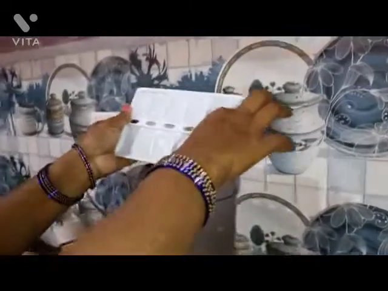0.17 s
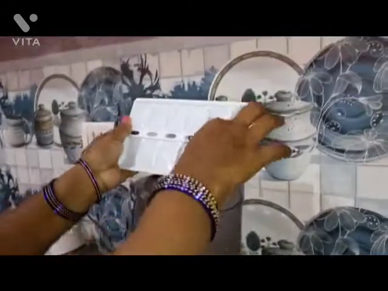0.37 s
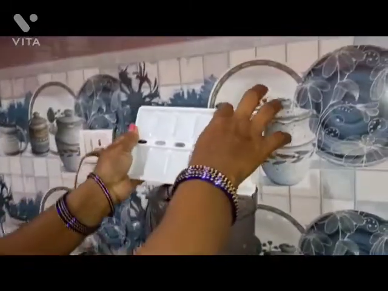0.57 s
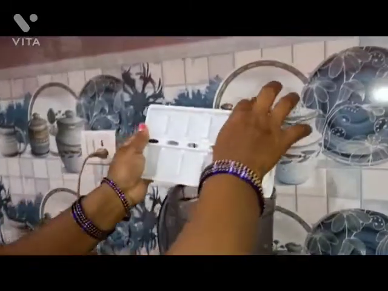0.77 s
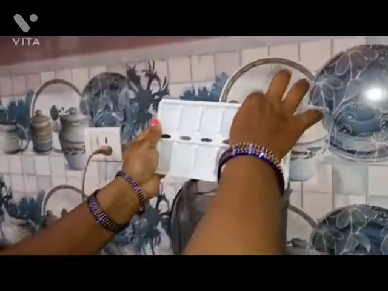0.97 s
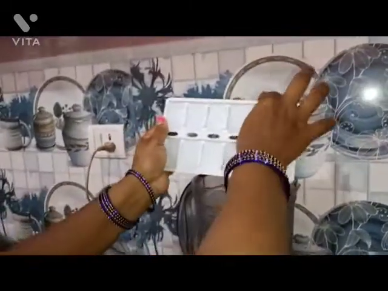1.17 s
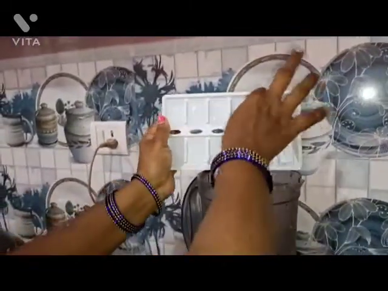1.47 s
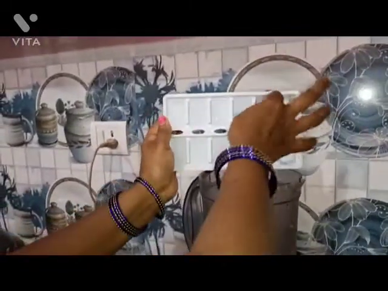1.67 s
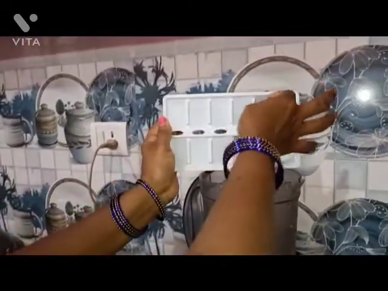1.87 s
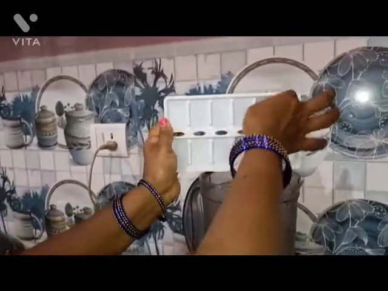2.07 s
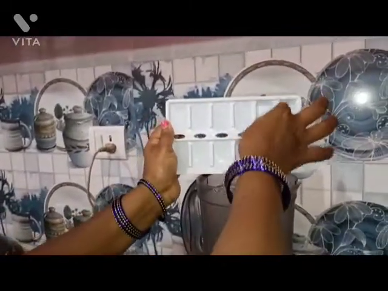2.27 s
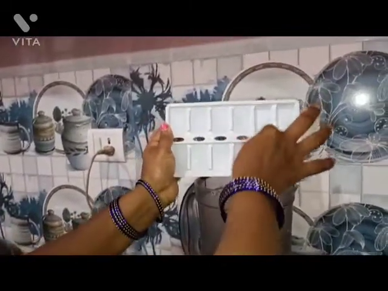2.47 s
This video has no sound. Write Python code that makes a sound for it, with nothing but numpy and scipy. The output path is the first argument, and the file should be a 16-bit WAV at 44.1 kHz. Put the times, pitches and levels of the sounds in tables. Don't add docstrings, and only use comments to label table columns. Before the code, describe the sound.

Ice cubes crack from a twisted plastic tray and clatter into a plastic jar in two bursts

```python
import sys
import numpy as np
from scipy import signal
from scipy.fft import rfft, irfft
from scipy.io import wavfile
from scipy.ndimage import uniform_filter1d

SR = 44100
rng = np.random.default_rng(int(sys.argv[2]) if len(sys.argv) > 2 else 0)


def magnitude_from_level(level_db):
    exponent = np.asarray(level_db, float) / 20
    return 10 ** exponent


def master_out(mix):
    frames = np.transpose(np.atleast_2d(mix))
    ceiling = np.clip(frames, -1, 1)
    pcm = np.round(ceiling * 32767).astype(np.int16)
    wavfile.write(sys.argv[1], SR, pcm)


N = 114660

# (frequency [Hz], density [dB per Hz])
HUM_SPECTRUM = [(12, -64), (20, -0.5), (123, -14.5), (154, -12.5), (252, -7.5), (1000, -14), (3970, -20.5),
                (4820, -30), (14500, -44.5)]
# (frequency [Hz], width [Hz], level [dB])
DRONES = [(81.8, 4, -67), (121.3, 22, -69), (251.8, 15, -63), (471, 81, -67)]
# (frequency [Hz], left-right likeness [0-1])
HUM_COHERENCE = [(60, 0.93), (240, 1), (950, 0.22), (3770, 0.023), (15000, 1)]
# (frequency [Hz], left minus right [dB])
HUM_BALANCE = [(60, 1), (950, -2), (15000, 18.5)]
# (time [s], level [dB])
HISS_LEVEL = [(0, -61.5), (.18, -55.5), (.8, -66.5), (1.5, -71), (1.9, -73), (2.6, -88.5)]
# (time [s], level [dB])
GRIP_LEVEL = [(0, -64), (.2, -81), (2, -66), (2.15, -60), (2.4, -65), (2.6, -78)]
# (time [s], level [dB], frequency [Hz])
COUNTER_BUMP = (.35, -42, 55)
# (frequency [Hz], t60 [s])
KITCHEN_T60 = [(1000, 0.29), (2000, 0.67), (3500, 0.63), (6000, 0.6), (10000, 0.32), (15000, 0.23)]
# (frequency [Hz], width [Hz], gain [dB])
TILE_MODES = [(1950, 160, 5), (3134, 106, 3)]
# (frequency [Hz], left minus right [dB])
PORT_BALANCE = [(300, 5), (700, -7), (1400, -2), (3000, 12), (5500, 12.5), (8500, -6.5), (11000, -0.5),
                (14000, 10)]
# (time [s], level [dB], centre [Hz], t60 [s], spread [octaves])
CREAKS = [(0.173, -49, 4400, 0.099, 0.42), (.827, -32, 3650, 0.045, 0.11), (0.98, -44.5, 3900, 0.035, 0.65),
          (1.18, -60.5, 4060, 0.26, 0.64), (1.313, -49.5, 3500, 0.088, 0.33),
          (1.462, -51, 3860, 0.088, 0.6), (1.657, -45, 4980, 0.034, 0.51), (2.005, -53.5, 2720, .15, 0.44),
          (2.018, -40.5, 3620, 0.039, 0.48), (2.027, -42, 3640, 0.055, 0.65),
          (2.044, -48, 3700, 0.25, 0.62)]
# (time [s], peak [dB], ring [Hz], low body [dB], edge [dB])
SNAPS = [
    (0.827, -22, 3750, -38, -23.5),
    (2.066, -13, 3500, -8, -36),
    (2.0706, -8, 3500, -12.5, -33),
    (2.0801, -24, 3660, -26, -32),
    (2.0898, -22, 3500, -26, -23),
]
# (time [s], level [dB], t60 [s], rise [s], top frequency [Hz])
CRACKS = [
    (.2, -14, 0.09, 0.0028, 16000),
    (1.64, -49, 0.42, 0.0035, 8600),
    (2.074, -36.5, 0.17, 0.0063, 11800),
    (2.195, -47, .03, 0.00039, 16200),
    (2.301, -19, 0.012, 0.0016, 16000),
]
# (frequency [Hz], level [dB])
CRACK_SPECTRUM = [(180, -81), (300, 1.5), (856, -26), (1080, -8), (3950, -4), (4990, -6), (6520, -0.5),
                  (14700, -10.5), (16000, -36)]
# (time [s], level [dB])
RATTLE_LEVELS = [
    [(.3, -35), (.32, -21.5), (.39, -29.5), (.45, -34.5), (.6, -40), (.7, -49)],
    [(2.2, -42), (2.24, -33.5), (2.42, -63), (2.5, -80)],
]
# (frequency [Hz], level [dB], t60 [s])
ICE_MODES = [(2120, 5.5, 0.012), (2600, -32, 0.017), (3000, -4, 0.071), (3118, -2.5, 0.052),
             (3230, -1.5, 0.048), (3478, 1, 0.025), (3700, -1.5, 0.082), (3930, 1, 0.05), (4456, -6, 0.094),
             (5310, 1, 0.064), (5650, -5, 0.084), (6670, 3, 0.012)]
# (frequency [Hz], level [dB], t60 [s])
WALL_MODES = [(480, -12, .09), (1110, -1, .06), (1210, 0, .065), (1450, -7, .04), (1750, -8, .035)]
# (frequency [Hz], level [dB])
BODY_SPECTRUM = [(750, -45), (1100, -2.5), (2200, 1.5), (3200, -1.5), (4200, -11), (5600, -4), (7000, -3),
                 (9000, -4)]
# (frequency [Hz], level [dB])
EDGE_SPECTRUM = [(5000, -11), (7000, -7.5), (8300, -4), (10500, 6), (12500, -2.5), (15000, -13),
                 (16500, -29)]
# (time [s], peak [dB], body [dB], edge [dB], ring time scale)
LANDINGS = [
    (0.2933, -3, -14, -15, 0.78),
    (2.194, -7.5, -12.5, -10.5, 0.77),
    (2.2268, -4.5, -11.5, -21, 0.64),
    (2.3028, -5, -12, -19.5, 0.56),
]
# (frequency [Hz], level [dB], t60 [s])
LANDING_MODES = [
    [(483, -19, 0.071), (1076, -7.5, 0.03), (1720, -14.5, 0.04), (2930, -4, 0.032), (3350, -2, 0.053),
     (3850, -8.5, 0.046), (5060, -26, 0.022)],
    [(488, -17.5, 0.19), (1177, -3, 0.062), (1510, -18, .03), (2495, -1, 0.032), (2820, -5, 0.036),
     (3280, 0.5, .035), (3800, -3.5, 0.03), (4540, -14, 0.04)],
    [(1172, -5.5, 0.055), (2230, 0, 0.047), (2580, -16, .04), (3124, -1, 0.068), (3500, -10.5, 0.036),
     (3930, -7, 0.049), (4300, -11, 0.027), (5530, -8, 0.034)],
    [(1083, -15.5, 0.073), (1464, -6.5, 0.056), (2340, 2, 0.036), (2634, -9.5, 0.028), (3050, -1.5, 0.059),
     (3288, -4.5, .04), (3700, -8, 0.042), (4790, -8, .03)],
]
# (time [s], peak [dB], strongest ring [Hz], wall boom [dB], edge [dB])
CLACKS = [(0.308, -16, 3500, -47, -13), (0.3146, -5, 4010, -31.5, -15.5), (0.325, -23, 3800, -35, -30),
          (0.333, -5.5, 5700, -42, -32), (0.339, -11, 3920, -42, -16), (0.347, -12, 4200, -39, -25),
          (0.35, -7, 5800, -38, -14), (0.3615, -5.5, 3500, -24, -17.5), (0.368, -14, 3500, -35, -18),
          (0.378, -9.5, 3700, -30.5, -18), (0.3844, -5, 3820, -26.5, -21), (0.39, -14.5, 3550, -31, -23),
          (0.4, -19, 3700, -43, -30), (0.471, -11.5, 3050, -23.5, -23), (0.544, -20, 3000, -13, -20),
          (0.6154, -40, 3800, -38, -30)]
# (frequency [Hz], level [dB], t60 [s])
CUP_MODES = [(1420, -37, 0.39), (1940, -36, 0.43), (3070, -43, 0.59), (3100, -40, .4)]
# (time [s], level [dB])
CUP_HITS = [
    (2.192, -3),
    (2.227, -11),
    (2.305, -13),
]


def evened(x):
    return x / np.sqrt(np.mean(x ** 2) + 1e-20)


def read(points, hz):
    f, value = np.transpose(points)
    return np.interp(np.log(hz + 1), np.log(f + 1), value)


def add(mix, s, sound):
    part = mix[round(s * SR):][:len(sound)]
    part += sound[:len(part)]


def colour(x, points, share=1):
    gain = magnitude_from_level(share * read(points, np.fft.rfftfreq(x.shape[-1], 1 / SR)))
    return irfft(rfft(x) * gain, x.shape[-1])


def resonance(hz, centre, width):
    return 1 / (1 + (2 * (hz - centre) / width) ** 2)


def burst(points, t60, centre_hz=3200, spread=1.8):
    t, hz = np.arange(4096) / SR, np.fft.rfftfreq(4096, 1 / SR)
    octaves = np.log2((hz + 1) / centre_hz)
    lean = magnitude_from_level(read(points, hz) - 6.9 * (octaves / spread) ** 2)
    noise = evened(irfft(rfft(rng.standard_normal(4096)) * lean))
    return noise * magnitude_from_level(-60 * t / t60) * np.minimum(t / 0.00042, 1)


def edge(t60):
    return burst(EDGE_SPECTRUM, t60, 9300, 18.0)


def ring(modes, centre_hz, spread, scatter_db, t60_scale=1):
    t = np.arange(4096) / SR
    hz, db, t60 = np.transpose(modes)[:, :, None]
    u = rng.standard_normal((3, len(modes), 1))
    db = db + scatter_db * u[0] - 9 * (np.log2(hz / centre_hz) / spread) ** 2
    decay = magnitude_from_level(db - 60 * t / (t60 * t60_scale))
    x = (decay * np.sin(2 * np.pi * hz * (1 + 0.025 * u[1]) * t + 1.11 * u[2])).sum(0)
    return x * np.minimum(t / 0.00088, 1) / abs(x).max()


def hum():
    frames, hz = N // 256 + 5, np.fft.rfftfreq(1024, 1 / SR)
    a, b, c, d, patches = rng.standard_normal((frames, 513, 5)).T
    patches = evened(uniform_filter1d(uniform_filter1d(patches, 10, 0), 12, 1))
    same = np.clip(read(HUM_COHERENCE, hz), -1, 1)[:, None]
    left = a + 1j * b
    right = same * left + np.sqrt(1 - same ** 2) * (c + 1j * d)
    half_balance = np.array([[.5], [-.5]]) * read(HUM_BALANCE, hz)
    spectrum = magnitude_from_level(half_balance + read(HUM_SPECTRUM, hz))[:, :, None]
    z = np.array([left, right]) * spectrum * magnitude_from_level(0.6 * patches)
    out = magnitude_from_level(-55) * evened(signal.istft(z, nperseg=1024, noverlap=768)[1][:, :N])
    t, fine = np.arange(N) / SR, np.fft.rfftfreq(N, 1 / SR)
    for f, width, db in DRONES:
        noise = rng.standard_normal((3, N))
        shared = noise[0] + 0.42 * noise[1:]
        out += magnitude_from_level(db) * evened(irfft(rfft(shared) * resonance(fine, f, width), N))
    hiss_spectrum = [(1000, -17), (3500, -9), (7000, 2.0), (14000, -1), (15500, -15)]
    hiss = evened(colour(rng.standard_normal((2, N)), hiss_spectrum))
    return out + hiss * magnitude_from_level(np.interp(t, *np.transpose(HISS_LEVEL)))


def thud():
    out, (s, db, hz) = np.zeros(N), COUNTER_BUMP
    t = np.arange(0, 1 / hz, 1 / SR)
    add(out, s, magnitude_from_level(db) * np.sin(2 * np.pi * t * hz) * np.hanning(len(t)))
    low = rng.standard_normal((3, N))
    low = colour(low[0] + .6 * low[1:], [(15, -23), (24, 6), (40, -5), (90, -30), (200, -72)])
    level = np.interp(np.arange(N) / SR, *np.transpose(GRIP_LEVEL))
    return out + evened(low) * magnitude_from_level(level)


def kitchen(x):
    taps = np.zeros((2, SR))
    at = np.arange(400, SR - 20, 20) + rng.integers(0, 20, (2, (SR - 401) // 20))
    np.put_along_axis(taps, at, rng.choice([-1., 1.], at.shape), 1)
    hz, t, z = signal.stft(taps, SR, nperseg=256)
    decay = magnitude_from_level(-60 * t / read(KITCHEN_T60, hz)[:, None])
    tail = signal.istft(z * decay, SR, nperseg=256)[1]
    fine = np.fft.rfftfreq(tail.shape[1], 1 / SR)
    tile_db = sum(db * resonance(fine, f, width) for f, width, db in TILE_MODES)
    tail = irfft(rfft(tail) * magnitude_from_level(tile_db), tail.shape[1])
    tail = magnitude_from_level(-6.5) * tail / np.linalg.norm(tail[0])
    early = np.zeros_like(tail)
    echo_at = rng.integers(60, 900, (2, 7))
    np.put_along_axis(early, echo_at, magnitude_from_level(-15.5) * rng.choice([-1., 1.], (2, 7)), 1)
    return signal.fftconvolve(x[None], tail + early, axes=1)[:, :N]


def creaks():
    out, t = np.zeros(N), np.arange(4096) / SR
    for s, db, hz, t60, spread in CREAKS:
        body = burst([(1000, 0), (9000, 0)], t60, hz, spread) + magnitude_from_level(-5.5) * edge(t60)
        swell = np.minimum(t / 0.0031, 1) * np.minimum((t[-1] - t) / 0.027, 1)
        add(out, s, magnitude_from_level(db) * body * swell)
    return out


def snaps():
    out, t = np.zeros(N), np.arange(4096) / SR
    envelope = magnitude_from_level(-60 * t / 0.0077) * np.minimum(t / 0.00014, 1)
    for s, db, hz, low_db, edge_db in SNAPS:
        pop = np.sin(2 * np.pi * hz * t)
        pop = pop + magnitude_from_level(-10) * np.sin(2 * np.pi * 0.504 * hz * t)
        pop = pop + magnitude_from_level(low_db + 3.5) * np.sin(2 * np.pi * 1150 * t)
        blow = envelope * pop + magnitude_from_level(-20) * burst(BODY_SPECTRUM, 0.077, hz, 1.05)
        blow = blow + magnitude_from_level(edge_db + 13) * edge(0.0086)
        add(out, s + 0.00069, magnitude_from_level(db) * blow)
    return out


def cracks():
    out, t = np.zeros(N), np.arange(16384) / SR
    for s, db, t60, rise, top_hz in CRACKS:
        size = magnitude_from_level(0.31 * np.minimum(rng.exponential(1, len(t)), 3))
        grains = rng.standard_normal(len(t)) * size * (rng.random(len(t)) < .4)
        slow = uniform_filter1d(uniform_filter1d(rng.standard_normal(len(t)), 70), 70)
        clumps = magnitude_from_level(3.75 * evened(slow))
        dull = colour(colour(grains, CRACK_SPECTRUM), [(top_hz, 0), (1.38 * top_hz, -18)])
        envelope = magnitude_from_level(db - 60 * t / t60) * np.minimum(t / rise, 1) ** 2
        add(out, s, evened(dull) * clumps * envelope)
    return out


def rattle():
    size = magnitude_from_level(4.4 * np.minimum(rng.exponential(1, N), 4))
    size = size * (rng.random(N) < 700 / SR)
    kind, t, out = rng.integers(0, 12, N), np.arange(N) / SR, np.zeros(N)
    level = sum(magnitude_from_level(np.interp(t, *np.transpose(c), -120, -120)) for c in RATTLE_LEVELS)
    for k in range(12):
        knock = ring(ICE_MODES, 3680, 0.46, 2.9, 0.41)
        knock = knock + magnitude_from_level(-9.5) * burst(BODY_SPECTRUM, 0.011) + magnitude_from_level(-22.0) * edge(0.023)
        out += signal.oaconvolve(size * level * (kind == k), knock)[:N]
    return out * magnitude_from_level(-3.5)


def landings():
    out, t = np.zeros(N), np.arange(4096) / SR
    for (s, db, body_db, edge_db, scale), modes in zip(LANDINGS, LANDING_MODES):
        tone = np.zeros(len(t))
        for f, d, t60 in modes:
            decay = magnitude_from_level(d - 60 * t / (scale * min(t60, .12)))
            tone += decay * np.sin(2 * np.pi * (f * t + 0.37 * rng.random()))
        tone = tone * np.minimum(t / 0.00086, 1) / abs(tone).max()
        body = magnitude_from_level(body_db) * burst(BODY_SPECTRUM, 0.033, 2620, 1.38)
        add(out, s, magnitude_from_level(db) * (tone + body + magnitude_from_level(edge_db) * edge(0.025)))
    return out


def blade_cup():
    out, t = np.zeros(N), np.arange(SR // 2) / SR
    for s, db in CUP_HITS:
        for f, d, t60 in CUP_MODES:
            tone = np.sin(2 * np.pi * (f * t + rng.random()))
            add(out, s, magnitude_from_level(db + d - 60 * t / t60) * tone)
    return out


def clacks():
    out = np.zeros(N)
    for s, db, hz, wall_db, edge_db in CLACKS:
        blow = magnitude_from_level(-0.5) * ring(ICE_MODES, hz, 0.46, 3.8, 0.53)
        blow = blow + magnitude_from_level(-7) * burst(BODY_SPECTRUM, 0.025, hz, 0.87)
        blow = blow + magnitude_from_level(wall_db + 13) * ring(WALL_MODES, 800, 6.6, 0.5)
        blow = blow + magnitude_from_level(edge_db + 7.5) * edge(0.04)
        add(out, s - .0004, magnitude_from_level(db - 2.0) * blow)
    return out


def scene():
    tray = signal.sosfilt(signal.butter(3, 900, "high", fs=SR, output="sos"), snaps() + creaks())
    blows = clacks() + blade_cup() + landings() + cracks() + rattle()
    near = blows + tray
    k = np.arange(256)
    shade = rng.standard_normal(256) * np.exp(-k / (0.0022 * SR))
    shade = shade / np.linalg.norm(shade) * magnitude_from_level(-3) + magnitude_from_level(-5.5) * (k == 0)
    direct = np.array([np.roll(near, shift=2), np.convolve(near, shade)[:N]])
    both = direct + kitchen(blows + magnitude_from_level(-7) * tray)
    both = signal.sosfilt(signal.butter(2, 420, "high", fs=SR, output="sos"), both)
    both = colour(both, [(520, -3), (750, -9.5), (1000, 0)])
    ports = np.array([colour(both[0], PORT_BALANCE, 0.31), colour(both[1], PORT_BALANCE, -0.41)])
    return ports + hum() + thud()


def band_limit(x):
    return signal.sosfilt(signal.butter(12, 16400, fs=SR, output="sos"), x)


def record(dry):
    soft = np.tanh(colour(dry, [(6500, 0.5), (7300, -5), (8000, 0.0)]) / 0.88) * 0.99
    hz, t, z = signal.stft(soft, SR, nperseg=2048)
    luck = uniform_filter1d(rng.standard_normal((len(hz) // 14 + 1, len(t))), 2, 1)
    luck = luck.repeat(14, 0)[:len(hz)]
    threshold = read([(5500, 3.5), (7200, .6), (9000, .7), (12000, .45), (15000, .25)], hz)
    starved = luck > threshold[:, None]
    jump = np.diff(np.log((abs(z) ** 2).sum((0, 1)))) > .7
    attack = np.r_[jump, False] | np.r_[False, jump]
    gain = np.where(starved & ~attack, magnitude_from_level(-30), 1)
    thin = signal.istft(z * gain, SR, nperseg=2048)[1][:, :N]
    thin = signal.oaconvolve(thin, signal.firwin(255, 15600, fs=SR)[None], "same")
    return band_limit(np.clip(thin, -.9, .9))


dry = scene()
out = record(dry)
master_out(out)
```